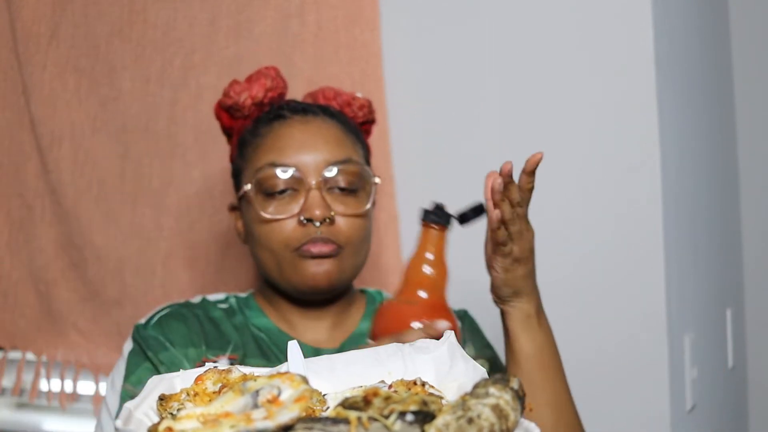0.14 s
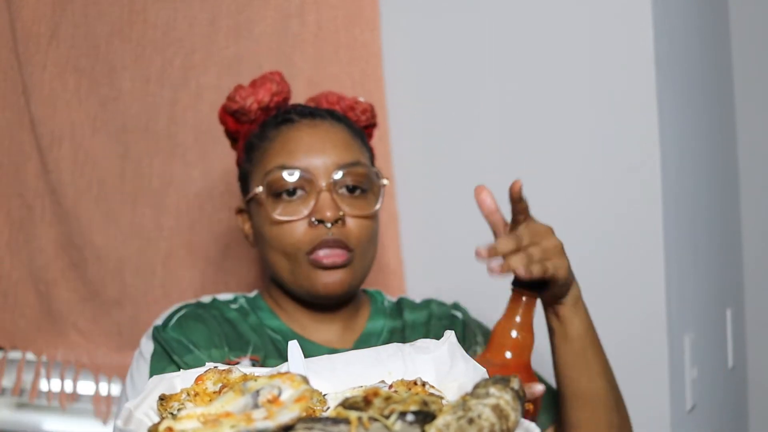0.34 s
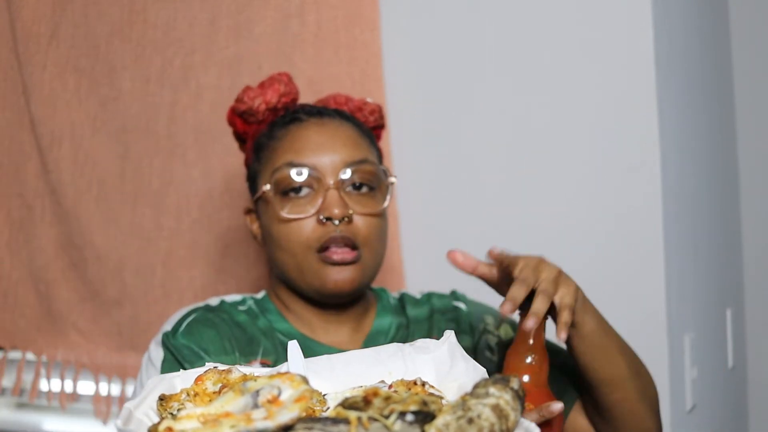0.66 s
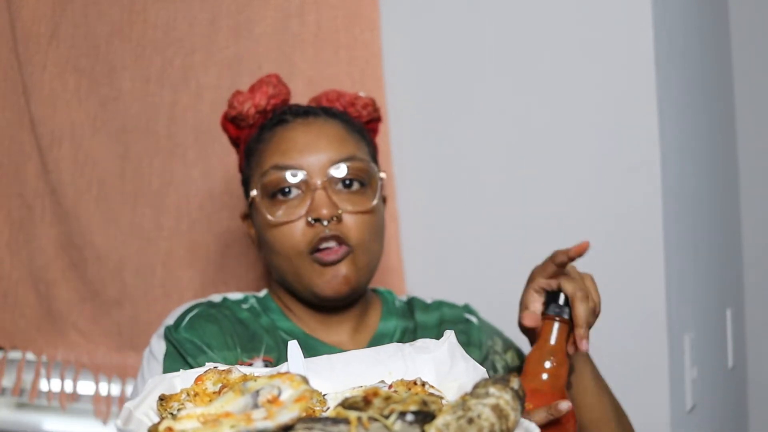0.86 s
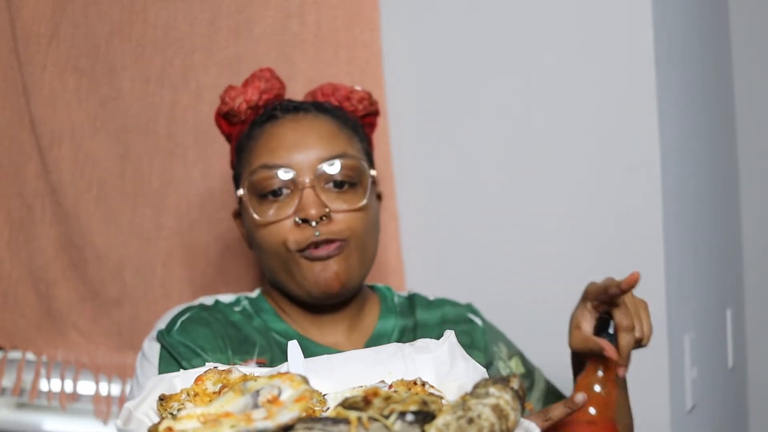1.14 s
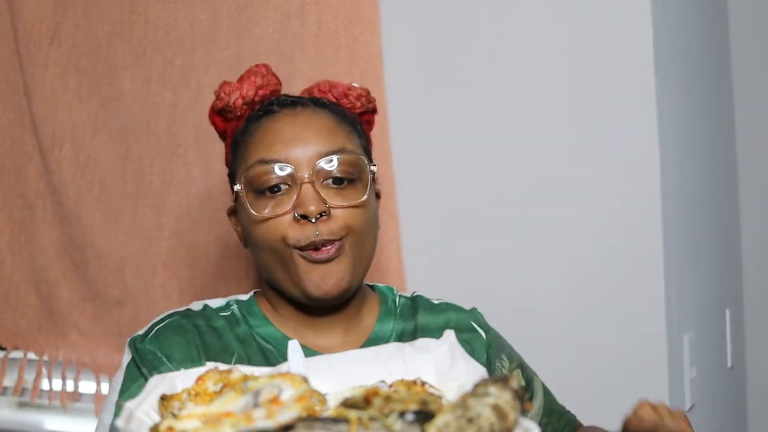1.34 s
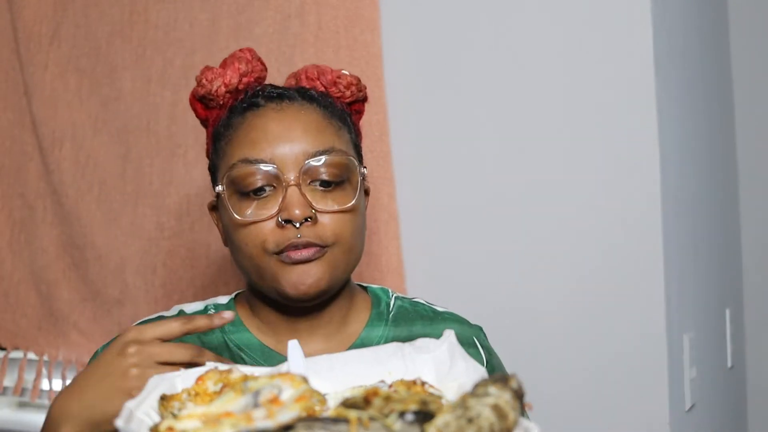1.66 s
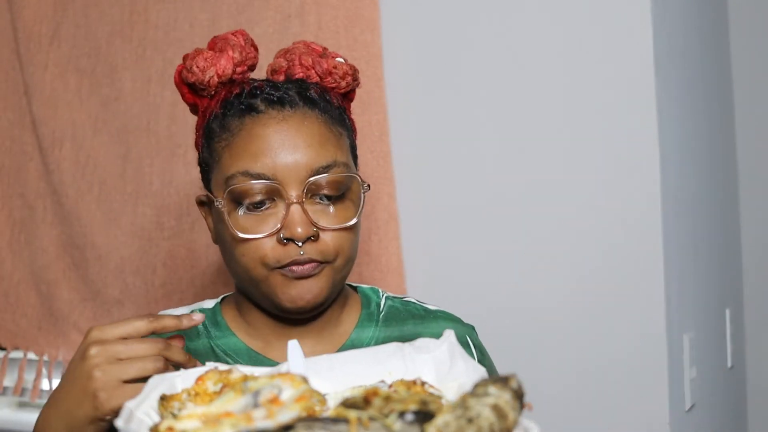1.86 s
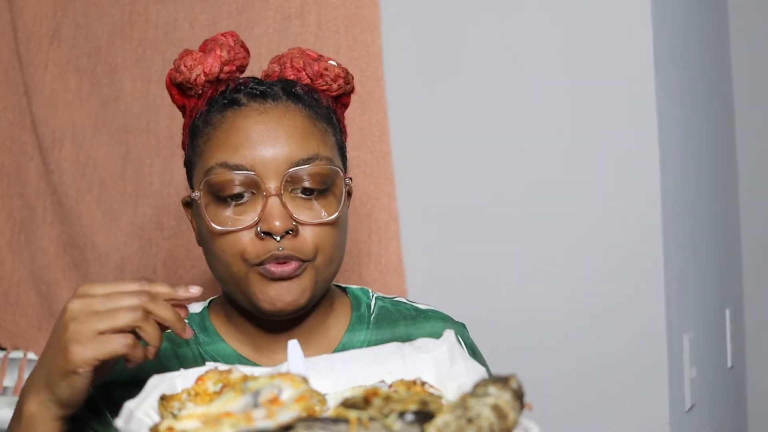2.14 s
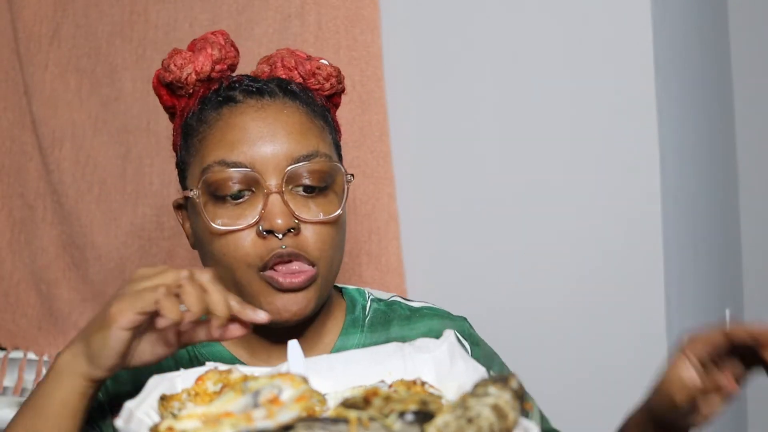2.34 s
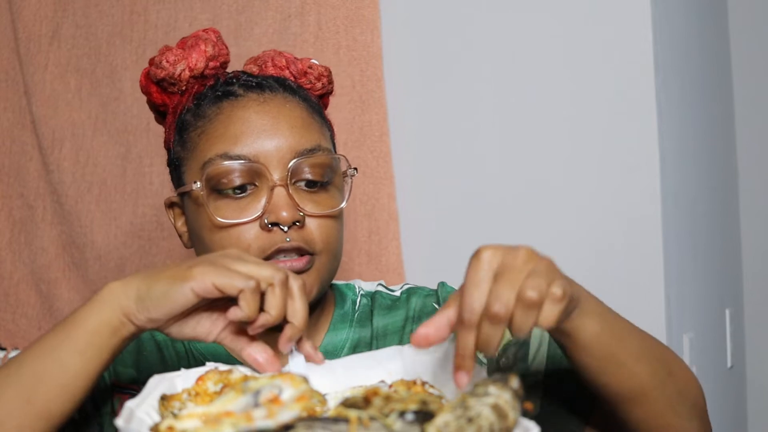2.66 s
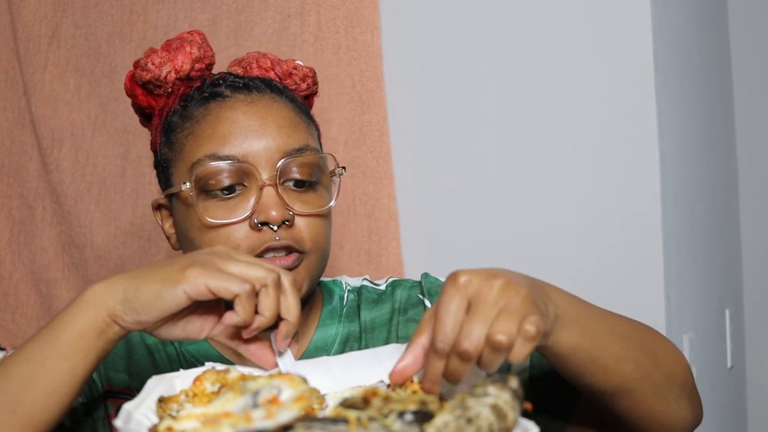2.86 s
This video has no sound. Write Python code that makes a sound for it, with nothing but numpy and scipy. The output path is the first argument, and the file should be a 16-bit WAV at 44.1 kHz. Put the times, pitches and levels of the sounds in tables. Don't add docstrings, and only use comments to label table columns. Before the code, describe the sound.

A plastic snap, very short, bright and loud, cracks at 0.4 s and echoes briefly off close walls. Barely audible ticks precede it near 0.17 s; softer clicks follow at 0.48 and 0.56 s, with faint touches up to 1.2 s. Only steady fan rumble, air hiss and low hum remain until about 2.6 s, when quick light clicks and thin scrapes on shell cluster irregularly until nearly 3 s.

```python
import sys
import numpy as np
from scipy import signal
from scipy.fft import rfft, irfft
from scipy.io import wavfile
from scipy.ndimage import uniform_filter1d

SR = 44100
rng = np.random.default_rng(int(sys.argv[2]) if len(sys.argv) > 2 else 0)


def unload_audio(sound):
    columns = np.transpose(np.atleast_2d(sound))
    steps = np.round(np.clip(columns, -1, 1) * 32767)
    wavfile.write(sys.argv[1], SR, steps.astype(np.int16))


def ratio(d):
    e = np.asarray(d, float) / 20
    return 10 ** e


N = 132300

# start in seconds, peak level in dB.
SNAP_EVENTS = [
    (.4036, -8),
]
# frequency in Hz, level in dB, 60 dB decay time in seconds.
SNAP_MODES = [(870, -15, .035), (1250, -23, .02), (1930, -16, .035), (2550, -18, .008), (3350, -6, .011),
              (3750, 0, .009), (4300, -7, .011), (5700, -17, .008), (6400, -9, .01), (7000, -14, .008),
              (9000, -21, .003)]
# start in seconds, peak level in dB, body mode in Hz, crack level in dB,
# upper edge of the crack in kHz.
TICKS = [(.1605, -44, 2500, -20, 12), (.185, -42, 1200, -10, 4), (.4831, -27, 2400, 8, 9),
         (.4845, -33, 12500, 9, 14), (.5615, -21, 2800, -2, 7), (.5622, -26, 1100, -20, 12),
         (.5645, -36, 5200, 0, 12), (.733, -53, 10000, 2, 12), (.868, -37, 9300, -20, 12),
         (1.214, -33, 1950, -22, 12), (1.217, -36, 2600, -20, 12), (2.11, -56, 9000, 10, 14),
         (2.556, -47, 7500, -8, 12), (2.628, -35, 2500, -20, 12), (2.651, -42, 2600, -4, 4),
         (2.676, -36, 2000, 1, 8), (2.6828, -31, 1900, 6, 9), (2.6835, -36, 8500, 2, 14),
         (2.6902, -32, 7000, 5, 9), (2.6918, -35, 13000, 4, 14), (2.693, -35, 1800, -6, 5),
         (2.6985, -38, 5500, 0, 8), (2.7012, -23, 1400, -5, 9), (2.709, -34, 6300, -3, 9),
         (2.711, -33, 1900, -10, 5), (2.7135, -39, 6300, -8, 8), (2.718, -29, 2000, 4, 6.5),
         (2.727, -33, 4400, -8, 7), (2.788, -40, 7000, 2, 12), (2.797, -41, 5000, 2, 12),
         (2.8463, -27, 2700, -20, 8), (2.8555, -37, 3000, -6, 7), (2.871, -38, 4700, -10, 7),
         (2.8897, -28, 7000, 3, 12), (2.8925, -33, 1500, 4, 10), (2.8985, -35, 4700, 3, 12),
         (2.9495, -29, 2000, -2, 11), (2.9503, -38, 10000, 4, 13), (2.958, -40, 6500, 2, 14)]
# start in seconds, length in seconds, level in dB, centre in Hz, width in Hz.
SCRAPES = [(2.645, .1, -55, 3000, 5000), (2.762, .045, -48, 7000, 5000), (2.86, .06, -55, 5000, 4500),
           (2.63, .4, -50, 1600, 1600), (.715, .12, -61, 5900, 800), (.72, .16, -66, 11000, 8000),
           (.565, .07, -58, 6000, 5500), (.566, .014, -50, 8000, 7000), (.488, .012, -50, 9000, 8000),
           (2.8, .22, -57, 9000, 8500), (2.894, .014, -50, 11000, 7000), (2.64, .11, -57, 11000, 8000),
           (.7, .12, -63, 2800, 2000), (.28, .12, -63, 2600, 1500)]
# delay in seconds, level in dB, smear in seconds.
WALL_ECHOES = [
    (.0033, -10, .0003),
    (.0081, -3, .0006),
    (.0128, -5, .001),
    (.0198, -14, .0015),
    (.0282, -11, .001),
]
# frequency in Hz, density in dB per Hz.
RUMBLE_SPECTRUM = [(13, -59), (22, -30), (38, -28), (65, -2), (108, 0), (162, -6), (193, -11), (365, -9),
                   (500, -17), (650, -24), (1100, -120)]
# frequency in Hz, density in dB per Hz.
AIR_SPECTRUM = [(290, -36.5), (500, -1), (690, -7.5), (1040, -11.5), (1220, -13), (1870, -17), (2220, -22),
                (15100, -38.5), (16500, -31)]
# frequency in Hz, side relative to mid in dB.
SIDE_SPECTRUM = [(60, -19), (110, -35), (200, -18), (380, -18.5), (700, -11.5), (1290, -9.5), (2380, -3.5),
                 (4400, 0), (8120, 1.5), (15000, 2.5)]
# frequency in Hz, width in Hz, level in dB.
ROOM_BOOMS = [
    (83.9, 7.9, -45),
    (111.2, 12.6, -41),
    (158.4, 24.4, -41),
    (222.3, 30, -48.5),
    (318, 34, -52),
    (1004, 5.4, -62.5),
    (31, 4.5, -63.5),
]
# frequency in Hz, rms level in dB.
MOTOR_HUM = [
    (360.5, -50),
    (468, -90),
]

MID_SIDE = np.array([[1], [-1]])


def level(x, db):
    return x * ratio(db) / np.sqrt(np.mean(x ** 2))


def ring(hz, t60):
    t = np.arange(4096) / SR
    return np.sin(2 * np.pi * hz * t) * np.exp(-np.log(1000) * t / t60)


def add(out, start_s, x):
    i = int(start_s * SR)
    out[i:i + len(x)] += x[:N - i]


def butter(x, order, hz, kind="low"):
    return signal.lfilter(*signal.butter(order, hz, kind, fs=SR), x)


def tint(x, spectrum):
    f = np.fft.rfftfreq(x.shape[-1], 1 / SR) + 1
    hz, db = np.array(spectrum, float).T
    gain = ratio(np.interp(np.log(f), np.log(hz), db))
    return irfft(rfft(x) * gain, x.shape[-1])


def resonate(x, hz, width):
    return signal.lfilter(*signal.iirpeak(hz, hz / width, fs=SR), x)


def walk(rate):
    k = int(SR / rate)
    steps = np.repeat(rng.standard_normal(N // k + 1), k)
    return 1.3 * uniform_filter1d(uniform_filter1d(steps, k), k)[:N]


def snap():
    crack_db, crack_low_hz, crack_decay_s = -11, 7000, .0003
    body = 0
    for k, (hz, db, t60) in enumerate(SNAP_MODES):
        body = body + (-1) ** k * ratio(db) * ring(hz, t60)
    t = np.arange(4096) / SR
    burst = np.sign(rng.standard_normal(4096)) * np.exp(-t / crack_decay_s)
    crack = butter(burst, 2, crack_low_hz, "high")
    impact = body / np.abs(body).max() + ratio(crack_db) * crack
    out = np.zeros(N)
    start_s, peak_db = SNAP_EVENTS[0]
    add(out, start_s, impact * ratio(peak_db))
    return out


def ticks():
    crack_t60_s, crack_low_hz, crack_high_hz = .007, 1300, 14000
    body_cycles, body_min_t60_s = 6, .004
    fade = np.exp(-np.log(1000) * np.arange(4096) / SR / crack_t60_s)
    out = np.zeros(N)
    for start_s, db, hz, crack_db, top_khz in TICKS:
        noise = rng.standard_normal(4096) * fade
        crack = butter(noise, 2, [crack_low_hz, min(top_khz * 1000, crack_high_hz)], "band")
        body = ring(hz, max(body_cycles * 2 / hz, body_min_t60_s))
        add(out, start_s, ratio(db) * (body + ratio(crack_db) * crack))
    return out


def scrapes():
    slips_per_s, scatter_db = 5000, 2.5
    t = np.arange(N) / SR
    out = np.zeros(N)
    for start_s, length_s, db, hz, width in SCRAPES:
        chance, sign, size = rng.random((3, N))
        slips = (chance < slips_per_s / SR) * np.sign(sign - .5)
        slips = slips * ratio(-scatter_db * np.log(size + 0.011))
        rubbed = resonate(resonate(slips, hz, width), hz, hz * 1.7)
        pressure = np.sin(np.pi * np.clip((t - start_s) / length_s, 0, 1))
        out += level(rubbed, db) * pressure
    return out


def room(early, late):
    tail_db, tail_side_db, tail_t60_s, tail_high_t60_s = 3.5, -7, 0.31, 0.22
    echo_side_db, late_from_s = -1, .015
    t = np.arange(SR // 2) / SR
    noise = rng.standard_normal((4, len(t)))
    low = butter(noise, 2, 5000)
    tail = low * ratio(-60 * t / tail_t60_s) + (noise - low) * ratio(-60 * t / tail_high_t60_s)
    tail = tail[0] + ratio(tail_side_db) * tail[1] * MID_SIDE
    tail = level(tail * np.clip(t / 0.0025, 0, 1), tail_db)
    echoes = 0
    for delay_s, db, smear_s in WALL_ECHOES:
        smear = noise[2] + ratio(echo_side_db) * noise[3] * MID_SIDE
        smear = smear * (t >= delay_s) * np.exp(-np.abs(t - delay_s) / smear_s)
        smear[:, int(delay_s * SR)] += 12
        if delay_s < late_from_s:
            echoes = echoes + level(smear, db)
        else:
            tail = tail + level(butter(smear, 2, 6000), db + 0.5)
    wet = signal.fftconvolve(early[None], echoes, axes=1) + signal.fftconvolve(late[None], tail, axes=1)
    return butter(wet[:, :N], 1, [500, 11000], "band") / np.sqrt(len(t))


def fan_noise():
    rumble_db, air_db = -37.5, -48
    noise = rng.standard_normal((2 + len(ROOM_BOOMS), N))
    out = level(tint(noise[0], RUMBLE_SPECTRUM), rumble_db)
    out = out + level(tint(noise[1], AIR_SPECTRUM), air_db) * ratio(.5 * walk(2.34))
    for drive, (hz, width, db) in zip(noise[2:], ROOM_BOOMS):
        out = out + level(resonate(resonate(drive, hz, width), hz, width * 2), db)
    return out


def motor_hum():
    t = np.arange(N) / SR
    out = np.zeros(N)
    for hz, db in MOTOR_HUM:
        tone = np.sin(2 * np.pi * hz * t + 0.72 * walk(3.5))
        out += level(tone, db) * ratio(2.7 * walk(5.37))
    return out


def fan():
    mid = fan_noise() + motor_hum()
    side = tint(fan_noise(), SIDE_SPECTRUM)
    return mid + side * MID_SIDE


def scene():
    hard, light = snap(), ticks() + scrapes()
    hard_feed = butter(hard, 2, 2900, "high")
    light_feed = butter(light, 2, 1100, "high")
    early = hard_feed * ratio(-.5) + light_feed * ratio(-4)
    late = hard_feed * ratio(2.5) + light_feed * ratio(-6)
    wet = room(early, late)
    air_top = signal.ellip(8, .5, 40, 15850, fs=SR, output="sos")
    background = signal.sosfilt(air_top, fan() + wet)
    direct = hard + light
    port_lag = .45 * np.gradient(direct)
    return direct - port_lag * MID_SIDE + background


def top_cut(x):
    return signal.sosfilt(signal.butter(12, 16820, fs=SR, output="sos"), x)


def record(dry):
    low_pass = signal.butter(10, 16600, fs=SR, output="sos")
    cut = signal.sosfilt(low_pass, dry)
    return top_cut(cut)


dry = scene()
out = record(dry)
unload_audio(out)
```